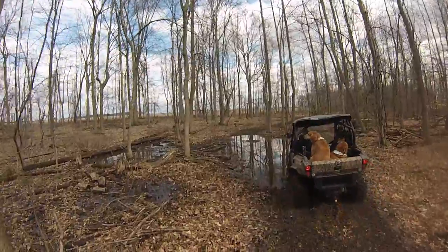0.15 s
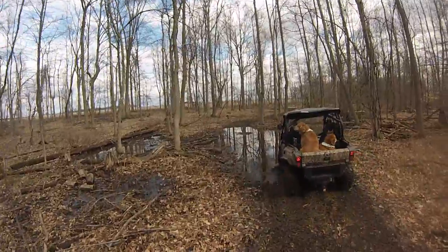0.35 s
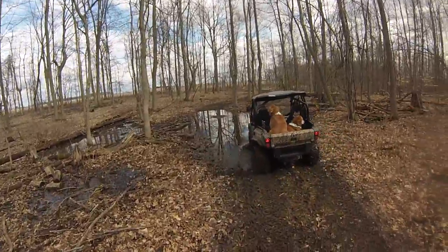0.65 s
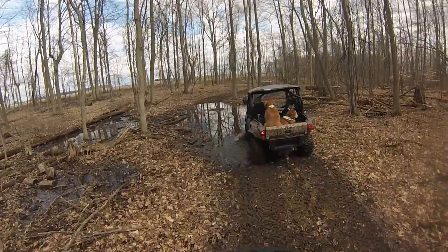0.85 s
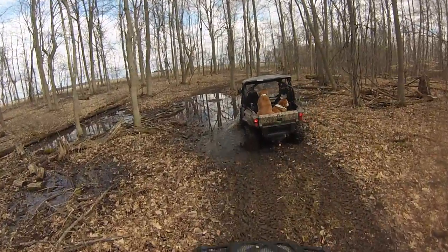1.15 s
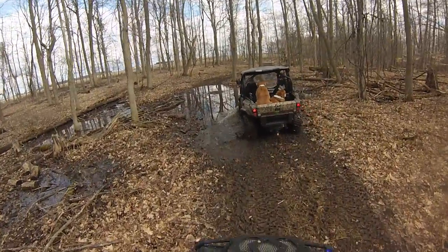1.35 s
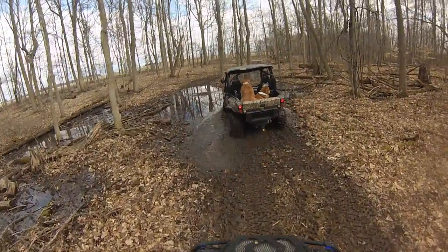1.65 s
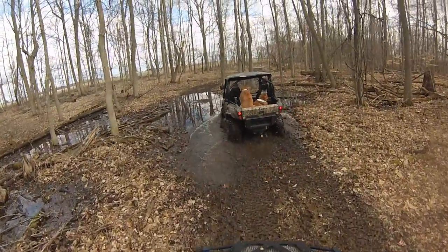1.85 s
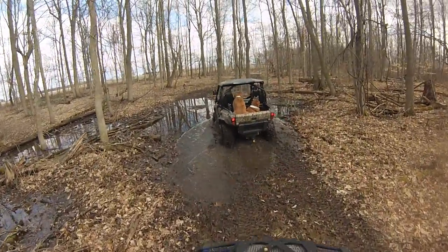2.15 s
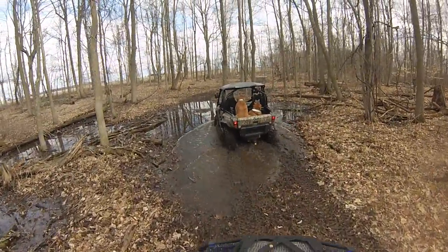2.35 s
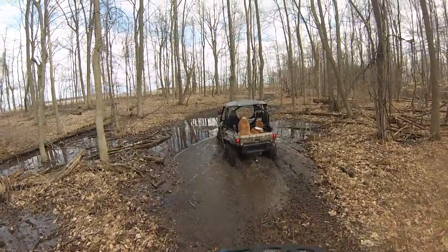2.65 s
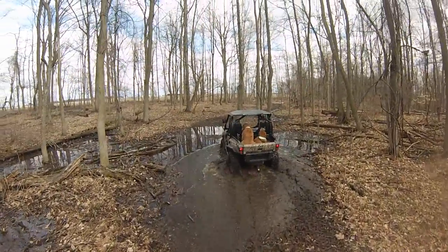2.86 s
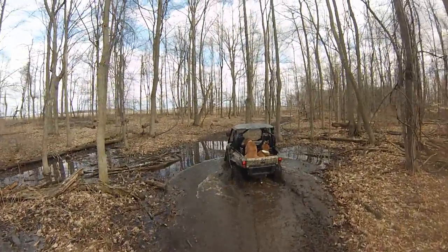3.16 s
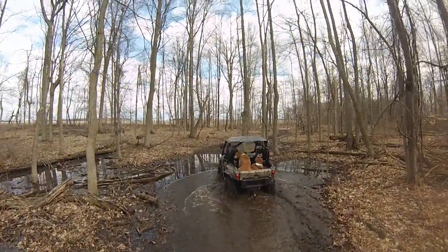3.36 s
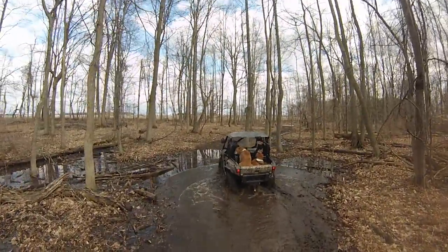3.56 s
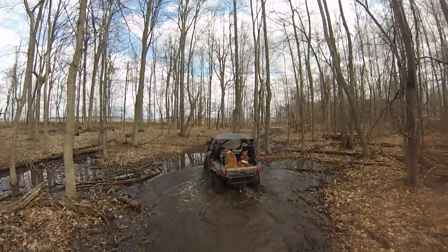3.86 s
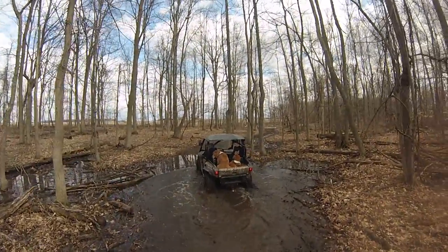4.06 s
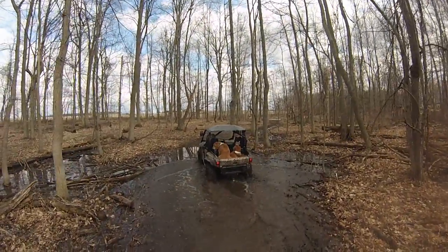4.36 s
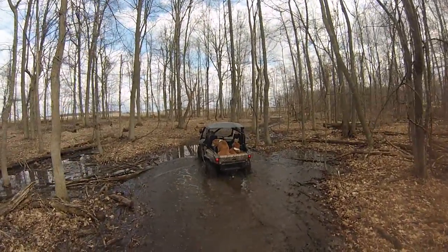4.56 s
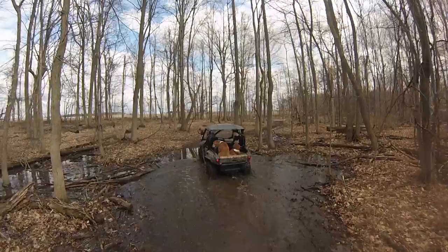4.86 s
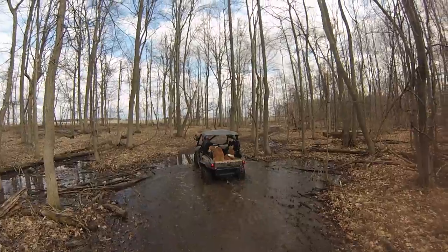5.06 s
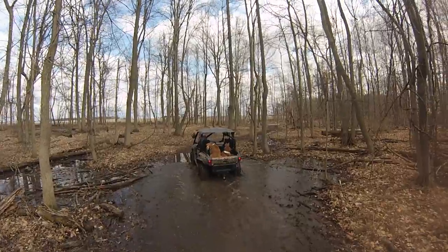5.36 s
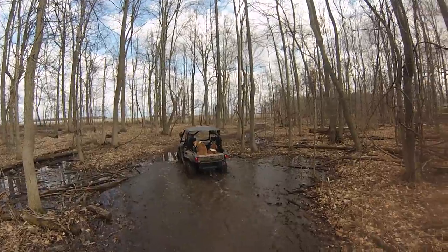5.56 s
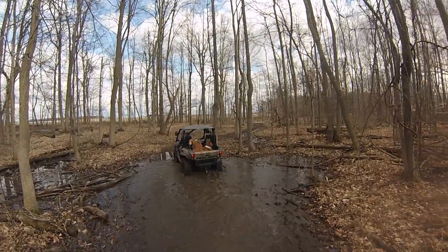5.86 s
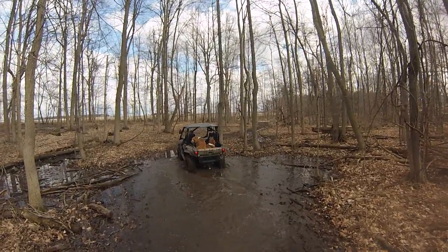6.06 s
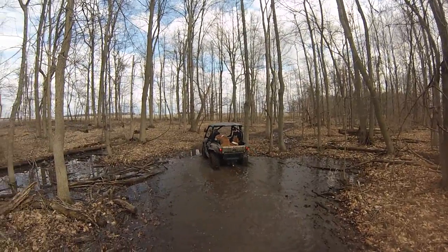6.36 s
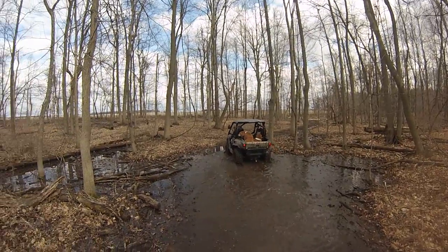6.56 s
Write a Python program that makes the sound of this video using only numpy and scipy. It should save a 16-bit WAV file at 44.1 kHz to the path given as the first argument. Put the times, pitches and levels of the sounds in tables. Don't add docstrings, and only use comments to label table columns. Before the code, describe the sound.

Heard from a microphone riding in a closed housing on an off-road vehicle in open woodland: a lumpy twin engine pulls, dips and surges with deep shaking bass, gear whine, tyre rumble, valve clatter and hollow panel knocks. Just before three seconds the throttle shuts, the whine slides down and the engine settles to a slow idle. A second vehicle ahead drones steadily through the mud pool, over faint hiss.

```python
import sys
import numpy as np
from scipy import signal
from scipy.fft import rfft, irfft, next_fast_len
from scipy.io import wavfile
from scipy.ndimage import map_coordinates

SR = 44100
rng = np.random.default_rng(int(sys.argv[2]) if len(sys.argv) > 2 else 0)


def volts_from_db(level):
    exponent = np.asarray(level, float) / 20
    return 10 ** exponent


def dump(signal):
    limited = np.clip(np.atleast_2d(signal).T, -1, 1)
    pcm = np.round(limited * 32767).astype(np.int16)
    wavfile.write(sys.argv[1], SR, pcm)


N = 295911
T = np.arange(N) / SR

# (time [s], firing cycles [1/s], crank shake = order 2 [dB], gear mesh rate [Hz])
NEAR = [(0, 19.05, -45, 675), (.55, 20.3, -38, 705), (.97, 19.45, -38.8, 705), (1.23, 19, -43.6, 776),
        (1.55, 19.35, -42.3, 803), (1.65, 19.78, -41.1, 842), (2, 21.1, -36.7, 882),
        (2.25, 22.8, -35.3, 1025), (2.5, 23.45, -34.3, 1038), (2.78, 21.95, -33.3, 880),
        (2.88, 19.6, -39, 735), (2.93, 17.4, -59, 655), (3.05, 14.2, -65, 573), (3.22, 12.95, -65, 525),
        (4.2, 11.15, -69, 430), (4.62, 9.8, -72, 400), (5.1, 10.35, -66, 400), (6.71, 10.05, -77, 400)]
TWIN_GAP = 3 / 8
OVERRUN_S = 2.74


def evened(x):
    return x / np.sqrt(np.mean(x ** 2) + 1e-20)


def columns(rows):
    s, *rest = np.transpose(rows)
    return [np.interp(T, s, c) for c in rest]


def wander(hz):
    coarse = T[::50]
    chance = rng.standard_normal(1000)
    return np.interp(T, coarse, map_coordinates(chance, [coarse * hz % 990], order=3))


def bump(s, length_s):
    return np.exp(-((T - s) / length_s) ** 2)


def resonance_db(hz, modes):
    return sum(top_db * np.exp(-((hz - mode_hz) / width_hz) ** 2) for mode_hz, width_hz, top_db in modes)


def coloured(x, shape):
    size = next_fast_len(N)
    hz, db = np.transpose(shape)
    log_hz = np.log(np.fft.rfftfreq(size, 1 / SR) + 1)
    gain = volts_from_db(np.interp(log_hz, np.log(hz), db, left=-40))
    return irfft(rfft(x, size) * gain, size)[:N]


def filtered(x, poles, hz, kind):
    return signal.sosfilt(signal.butter(poles, hz, kind, fs=SR, output="sos"), x)


def resonate(x, hz, width):
    r = np.exp(-np.pi * width / SR)
    pole = [1, -r * np.exp(2j * np.pi * hz / SR)]
    return 2 * signal.lfilter([(1 - r) ** 2], np.convolve(pole, pole), x).real


def order(turns, multiple, db, uneven_db, uneven_hz, lag=0):
    sign = np.copysign(np.sqrt(2), np.cos(np.pi * multiple * TWIN_GAP))
    level = volts_from_db(db + uneven_db * wander(uneven_hz))
    return level * sign * np.cos(2 * np.pi * multiple * turns - lag)


def firing_gate(turns, depth, sharp):
    first = np.exp(-sharp * ((turns + TWIN_GAP / 2) % 1))
    second = np.exp(-sharp * ((turns - TWIN_GAP / 2) % 1))
    return evened(1 - depth + depth * (first + .4 * second))


def rolling():
    standing_hz, full_hz = 387, 803
    mesh_hz = columns(NEAR)[2]
    return np.clip((mesh_hz - standing_hz) / (full_hz - standing_hz), 0, 1)


def hiss():
    # (frequency [Hz], density [dB])
    hiss_shape = [(1000, -16), (3000, 5), (6000, 5), (9000, 1.5), (12000, 0), (15000, -3)]
    return volts_from_db(-84.5) * evened(coloured(rng.standard_normal(N), hiss_shape))


def whistle():
    # (frequency [Hz], level [dB])
    whistle_tones = [(3596, -97.5), (7192, -102), (10788, -105)]
    return sum(np.sqrt(2) * volts_from_db(db) * np.sin(2 * np.pi * hz * T) for hz, db in whistle_tones)


def sway():
    low = filtered(rng.standard_normal(N), 3, [3, 15], "band")
    return volts_from_db(-75.5 + 0.5 * (columns(NEAR)[1] + 71)) * evened(low)


def far_engine():
    # (time [s], firing cycles [1/s], order 6 level [dB])
    far_course = [(0, 22.4, -70), (.3, 22.1, -73.5), (1, 19.75, -74.5), (1.6, 21.3, -73.4),
                  (2.3, 22.6, -70), (3, 23.9, -71.5), (3.5, 24.2, -71.3), (4.1, 25.4, -70), (4.75, 26, -68),
                  (5.3, 26.7, -68.2), (5.75, 26.55, -68.4), (6.2, 27, -71.3), (6.71, 27.2, -71.3)]
    # (order [multiple of the cycle], level re order 6 [dB])
    far_orders = [(2, -8), (3, -13.5), (4, 5), (5, -12), (6, 0), (7, -8.5), (8, -19.5), (9, -15.5),
                  (10, -13), (11, -25.5), (12, -19.5), (13, -36), (14, -28), (15, -22), (18, -26.5),
                  (19, -45.5), (20, -33)]
    # (frequency [Hz], width [Hz], lift [dB])
    far_pipe = [(121, 7, 6), (238, 36, 8.5), (345, 22, 10), (500, 40, 7)]
    hz, level_db = columns(far_course)
    turns = np.cumsum(hz * (1 + .005 * wander(6.0))) / SR
    bass_db = -69 + 1.4 * np.minimum(level_db + 71.5, 0)
    open_s, open_length_s, shut_share = 3.2, .5, .35
    dull_s, dull_db_per_s = 4.85, -1.5
    out = np.zeros(N)
    for k, db in far_orders:
        opened = shut_share + (k > 13.5) + (T - open_s) / open_length_s
        swell_db = resonance_db(round(k) * hz, far_pipe) * np.clip(opened, shut_share, 1)
        swell_db += dull_db_per_s * (k > 8.5) * np.maximum(T - dull_s, 0)
        base_db = level_db if k > 4.5 else bass_db
        out += order(turns, round(k), base_db + db + swell_db, 1.1, 4.0, .07 * k * k)
    return out


def ticks():
    # (time [s], peak level [dB], frequency [Hz])
    rattles = [(.164, -75, 4800), (.33, -73, 6600), (.512, -78, 7160), (.612, -73, 4600), (.688, -73, 6800),
               (.765, -68, 6330), (.85, -74, 6600), (1.11, -69, 4900), (1.543, -77, 4480),
               (1.673, -71, 4600), (2.453, -71, 5230), (3.416, -76, 6530), (3.55, -74, 5030),
               (3.68, -58, 1520), (2.83, -77, 4580), (3.485, -75, 4500), (5.118, -78, 4500),
               (0.267, -78, 4770), (.898, -72, 4500), (6.448, -81, 6540), (4.035, -77, 6500),
               (5.04, -80, 6600), (6.408, -74, 5970), (6.694, -75, 6500)]
    out, t = np.zeros(N), T[:800]
    for (s, db, hz), chance in zip(rattles, rng.random((len(rattles), 20))):
        pings = sum(np.sin(2 * np.pi * (hz * (.88 + 0.22 * a) * t + b)) for a, b in chance.reshape(-1, 2))
        burst = volts_from_db(db - 60 * t / 0.035) * pings / 2.5 * np.minimum(t / 0.0022, 1)
        start = round(s * SR)
        part = slice(start, min(N, start + len(t)))
        out[part] += burst[:part.stop - part.start]
    return out


def knocks():
    # (time [s], peak level [dB], frequency [Hz])
    panel_knocks = [(0.0433, -66, 1480), (0.2099, -60, 1470), (0.3406, -52, 1420), (0.415, -57, 1470),
                    (0.4643, -55, 1490), (0.6614, -54, 1387), (0.712, -49, 1415), (0.7711, -52, 1380),
                    (0.8659, -46, 1420), (0.9398, -60, 1360), (1.214, -50, 1400), (1.273, -43.5, 1550),
                    (1.3808, -56, 1400), (1.4723, -52, 1616), (1.542, -51, 1536), (1.7419, -57, 1400),
                    (1.7818, -64, 1600), (1.8287, -46.5, 1430), (1.9167, -59, 1520), (2.0542, -55, 1480),
                    (2.103, -62, 1200), (2.1495, -59, 1470), (2.1934, -59, 1160), (2.367, -53, 1505),
                    (2.4167, -50, 1530), (2.45, -55, 1480), (2.4967, -62, 1480), (2.61, -65, 1400),
                    (2.7243, -53, 1476), (2.8429, -60, 1540), (3.8871, -63, 1400), (4.0065, -53, 1480)]
    t60_s = 0.07
    out, t = np.zeros(N + 4000), T[:4000]
    for (s, db, hz), (a, b) in zip(panel_knocks, rng.random((len(panel_knocks), 2))):
        pair = np.sin(2 * np.pi * hz * t) + 0.45 * np.sin(2 * np.pi * (hz * (.94 + .12 * a) * t + b))
        fall = volts_from_db(db - 8 - 60 * t / t60_s)
        out[round(s * SR):][:len(t)] += fall * pair * np.minimum(t / 0.005, 1)
    return out[:N]


def narrow_rings():
    # (start [s], end [s], frequency [Hz], width [Hz], level [dB])
    rings = [(1.9, 2.7, 3250, 40, -83), (1.2, 1.85, 3255, 90, -79), (1.95, 2.8, 2630, 50, -83),
             (.6, 1.2, 2970, 50, -86), (2.2, 2.9, 2970, 50, -80), (4.5, 5.2, 520, 15, -87),
             (5, 6.4, 480, 15, -88), (2, 2.8, 600, 60, -82), (0, .45, 1390, 20, -80),
             (.5, 1.3, 1394, 20, -75), (1, 2.3, 2980, 120, -81), (1.7, 1.92, 305, 25, -74),
             (2.08, 2.24, 315, 30, -75), (.45, .8, 1500, 120, -76), (2.95, 3.3, 800, 200, -84),
             (1.35, 1.65, 1605, 30, -75), (2.15, 2.55, 2070, 50, -78), (3.3, 3.6, 440, 25, -85),
             (0, .5, 275, 30, -78), (2.8, 2.88, 2360, 50, -72), (2.76, 2.83, 2600, 60, -75),
             (.3, .8, 690, 30, -81), (2.86, 3.05, 620, 60, -82), (6.05, 6.45, 1600, 120, -81),
             (3.15, 3.32, 2350, 60, -84), (2.4, 2.75, 2940, 60, -82), (3.45, 3.75, 205, 30, -79),
             (1.3, 1.75, 205, 30, -78), (6.2, 6.32, 1170, 50, -82), (5.9, 6.4, 1900, 200, -84),
             (3.5, 4.4, 278, 10, -82)]
    out = np.zeros(N)
    for start, end, hz, width, db in rings:
        swell = np.sin(np.pi * np.clip((T - start) / (end - start), 0, 1))
        out += volts_from_db(db) * swell * evened(resonate(rng.standard_normal(N), hz, width))
    return out


def rumble(turns):
    # (frequency [Hz], level [dB])
    rumble_shape = [(12, 15.5), (30, 24.5), (60, 31), (120, 7), (200, 9), (320, 2.5), (500, 2), (800, -3.5),
                    (1100, -11.5), (1600, -33)]
    # (time [s], level over the rumble [dB])
    jolts = [(.47, 1.5), (.64, 4.5), (.77, 3.5), (.93, 3.5), (1.75, -2), (1.94, 2.5), (2.03, 3), (2.17, 6),
             (1.86, 4), (2.48, 7.5), (2.55, 3.5), (2.8, 5), (3.6, 2.5), (3.98, 3), (2.99, 2), (6.64, 3)]
    thump_lead = .24
    thumps = rng.standard_normal(N) * firing_gate(turns + thump_lead, depth=0.5, sharp=3)
    noise = coloured(thumps, rumble_shape)
    reference = filtered(noise, 4, [350, 900], "band").std()
    level_db = -81 + 0.069 * (columns(NEAR)[1] + 70) + 3 * rolling()
    level_db += sum(db * bump(s, 0.047) for s, db in jolts)
    deep = signal.sosfiltfilt(signal.butter(2, 105, fs=SR, output="sos"), noise)
    return (volts_from_db(level_db + 0.66 * wander(12.0)) * (noise - deep) + volts_from_db(-82.5) * deep) / reference


def clatter(turns):
    # (frequency [Hz], width [Hz], level [dB])
    housing = [(1400, 25, -6), (1480, 65, -2.5), (1562, 107, -5), (2372, 194, -13), (2567, 66, -15.5),
               (3200, 150, -16), (5100, 300, -32.5), (6600, 290, -27.5)]
    # (frequency [Hz], level [dB])
    clatter_shape = [(600, -27.5), (1000, -9.5), (1300, -2.5), (2000, -7), (2500, -14.5), (2850, -15),
                     (3500, -18), (5000, -24), (8000, -38), (13000, -48)]
    hz = columns(NEAR)[0]
    revving = np.clip((hz - 11) / 14.2, 0, 1)
    level_db = -74 + 2.5 * revving + 6 * rolling()
    level_db += bump(1.28, 0.15)
    shut_s, coast_s = 2.89, 0.26
    coasting = np.maximum(T - shut_s, 0) / coast_s
    bright_db = -2 + 6 * rolling() + 3.5 * coasting * np.exp(1 - coasting)
    bright_db -= 4 * np.maximum(1 - T / .55, 0)
    bright_db -= 0.9 * np.maximum(hz - 19.5, 0)
    strength = volts_from_db(4.3 * np.minimum(rng.exponential(1, N), 5))
    impacts = strength * (rng.random(N) < 1500 / SR) * rng.choice([-1, 1], N)
    drive = (rng.standard_normal(N) + .5 * evened(impacts)) * firing_gate(turns, depth=.3, sharp=9.0)
    rung = sum(volts_from_db(db + 0.8 * wander(6.4)) * resonate(drive, mode_hz, 2.1 * width_hz)
               for mode_hz, width_hz, db in housing)
    splash = volts_from_db(.8 * wander(16))
    whole = evened(rung + splash * coloured(drive, clatter_shape))
    treble = filtered(whole, 2, 2000, "high")
    return volts_from_db(level_db + 0.031 * wander(14.0)) * (whole + (volts_from_db(bright_db) - 1) * treble)


def gears():
    # (multiple of the mesh rate, 4/3 being a second gear pair; level off resonance [dB])
    gear_tones = [(1, -89), (4 / 3, -90), (2, -87.5), (3, -88), (4, -91)]
    # (frequency [Hz], width [Hz], lift [dB])
    gear_case = [(690, 30, 5), (735, 25, -6), (805, 35, 13.5), (1100, 80, 4), (1260, 110, 10),
                 (1540, 58, 8), (2000, 130, -9), (2100, 30, 10), (2370, 74, 13.5), (2590, 110, 11),
                 (3000, 120, 1)]
    # (time [s], mesh rate added [Hz])
    belt_slip = [
        (.97, 0),
        (1.23, -66),
        (1.27, 8),
        (1.55, 0),
    ]
    spin = bump(.47, .09)
    hz = columns(NEAR)[2] + 52 * spin + columns(belt_slip)[0]
    overrun = T > OVERRUN_S
    overrun_db = 5 * np.clip((T - OVERRUN_S) / 0.036, 0, 1)
    stop_db = np.maximum(580 - hz, 0)
    out = np.zeros(N)
    for k, tone_db in gear_tones:
        db = tone_db + resonance_db(k * hz, gear_case) - stop_db + 5 * spin
        db = db + overrun_db * np.sign(k - 1.5)
        play = (.013 - .007 * overrun) * wander(90)
        turns = np.cumsum(k * hz * (1 + play)) / SR
        rough_db = (2.3 - 1.2 * overrun) * wander(25 + 10 * k)
        out += volts_from_db(db + rough_db) * np.sqrt(2) * np.cos(2 * np.pi * turns)
    return out


def pipe(turns):
    # (frequency [Hz], width [Hz])
    pipe_modes = [(200, 55), (290, 38)]
    # (time [s], level over an ordinary blow [dB])
    hard_firings = [(.151, 2.5), (.355, 4.5), (.453, 7.5), (.504, 3), (.604, 4), (.702, 4), (.8, 4),
                    (.849, 3.5), (1.004, 5), (1.055, 3), (1.104, 4.5), (1.631, 3), (1.729, 5), (1.781, 6.5),
                    (1.872, -4), (1.974, 0.5), (2.17, 1.5), (2.228, 5), (2.756, -3), (1.42, -11),
                    (1.47, -1), (.9, 3)]
    hz, shake_db, _ = columns(NEAR)
    blow_lead, reach_s = .42, .022
    cycle = np.floor(turns + blow_lead).astype(int)
    blows = np.diff(cycle, prepend=cycle[0]) * volts_from_db(0.35 * rng.standard_normal(200))[cycle]
    hard = volts_from_db(sum(db * (abs(T - s) < reach_s) for s, db in hard_firings))
    rung = []
    for mode_hz, width_hz in pipe_modes:
        ordinary = resonate(blows, mode_hz, width_hz)[:3 * SR].std()
        rung.append(resonate(blows * hard, mode_hz, width_hz) / ordinary)
    fade = np.clip((2.95 - T) / .1, 0, 1)
    choke_db = 8 * np.maximum(np.maximum.accumulate(hz) - 22.4, 0)
    low_db = -67.5 - 0.25 * choke_db
    high_db = -71.5 - choke_db + 0.15 * (shake_db + 40)
    return fade * (volts_from_db(low_db - 5) * rung[0] + volts_from_db(high_db - 5) * rung[1])


def near_engine():
    # (order [multiple of the cycle], pulling level re order 5 [dB], idle level re order 5 [dB])
    near_orders = [(1, -12, -28), (4, 0, -7.5), (6, -16, -15), (7, -24, -14), (8, -22, -11), (9, -16, -23),
                   (10, -30, -24), (11, -19, -24), (13, -19, -35), (15, -21, -35)]
    # (firing cycles [1/s], level [dB])
    third_order = [(10, -68), (12, -57), (15, -49.5), (19.5, -53), (23.4, -62)]
    # (gear mesh rate [Hz], level [dB])
    fifth_order = [(430, -60.5), (550, -63), (690, -60), (790, -65.5), (880, -64), (1030, -67.5)]
    hz, shake_db, mesh_hz = columns(NEAR)
    turns = np.cumsum(hz * (1 + .003 * wander(8.0))) / SR + .74
    pulling = np.clip((hz - 13.5) / 7.5, 0, 1)
    loaded = np.clip((hz - 13) / 4, 0, 1)
    third_db = np.interp(hz, *np.transpose(third_order))
    fifth_db = np.interp(mesh_hz, *np.transpose(fifth_order))
    fifth_db += -3.5 * loaded * np.clip((T - OVERRUN_S) / 0.13, 0, 1)
    fifth_db += 0.29 * (1 - loaded) * np.minimum(shake_db + 75.5, 6)
    lag = .55 * loaded
    out = order(turns, 2, shake_db, .2 + 1.5 * (1 - pulling), 6.0, lag)
    out += order(turns, 3, third_db, .7, 6.0, lag)
    out += order(turns, 5, fifth_db, .7, 6.0, lag + np.pi * loaded)
    for k, pull_db, idle_db in near_orders:
        db = fifth_db + pulling * pull_db + (1 - pulling) * idle_db
        out += order(turns, round(k), db, 1.6 - .6 * loaded, 5.0, 2 * lag)
    return out, turns


def scene():
    near, turns = near_engine()
    background = sway() + far_engine() + ticks() + knocks() + narrow_rings()
    vehicle = rumble(turns) + clatter(turns) + gears() + pipe(turns) + near
    return (background + vehicle)[None]


def band_limit(x):
    return signal.sosfilt(signal.butter(12, 12600, fs=SR, output="sos"), x)


def record(dry):
    return band_limit(dry + hiss() + whistle())


dry = scene()
out = record(dry)
dump(out)
```